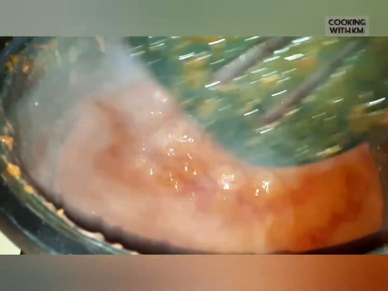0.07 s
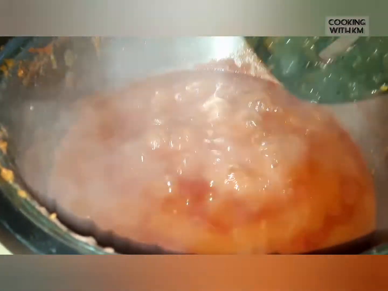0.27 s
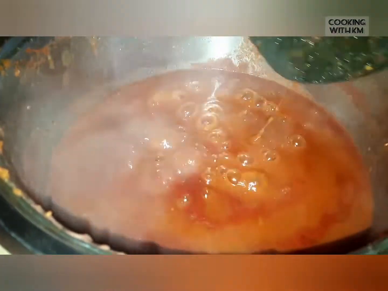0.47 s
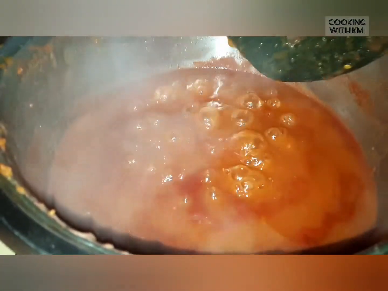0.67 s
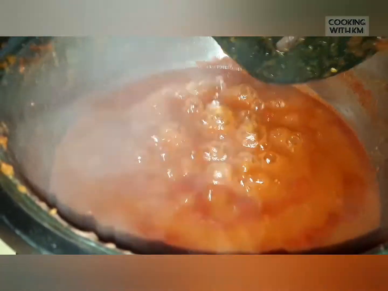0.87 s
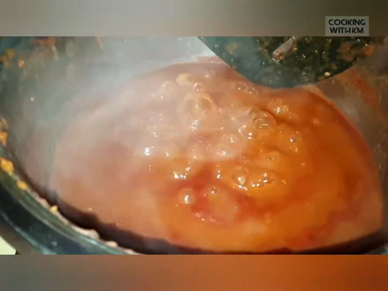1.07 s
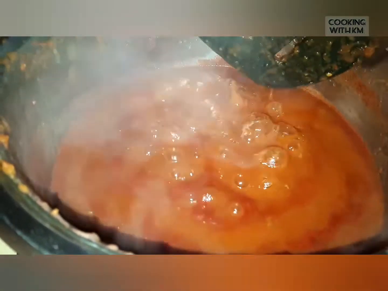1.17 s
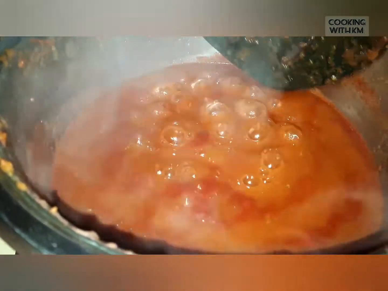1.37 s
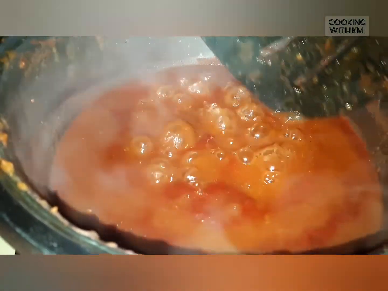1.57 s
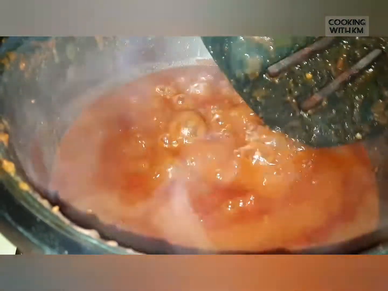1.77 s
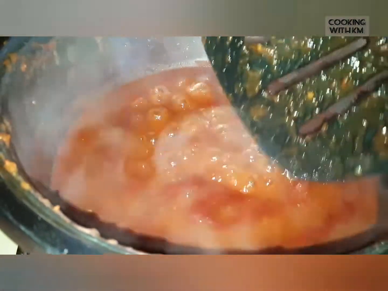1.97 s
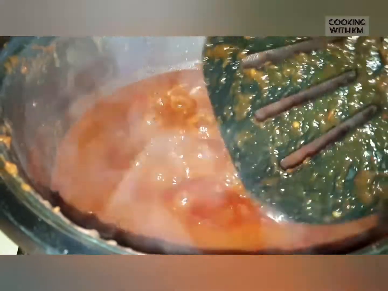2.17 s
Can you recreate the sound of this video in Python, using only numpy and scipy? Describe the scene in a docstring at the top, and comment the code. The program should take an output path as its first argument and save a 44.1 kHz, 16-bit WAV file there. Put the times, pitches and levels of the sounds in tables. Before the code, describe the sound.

Thick tomato sauce boiling in an open pot, bubbles bursting with irregular plops.

```python
"""Tomato sauce on the boil

Thick sauce boils in an open pot in a small kitchen, close by and a little to the left.
Each bubble opens into a short damped note; films snap brightly and droplets tick on the hot wall.
Under them lie small blubs, seeping steam, a steady murmur, a faint sizzle and the stove's hum."""
import sys
import numpy as np
from scipy import signal
from scipy.fft import rfft, irfft, next_fast_len
from scipy.io import wavfile
from scipy.ndimage import uniform_filter1d, map_coordinates

SR = 44100
rng = np.random.default_rng(int(sys.argv[2]) if len(sys.argv) > 2 else 0)


def transcribe(signal):
    """Save signal, clipped to [-1, 1], as a 16-bit WAV file at the path in sys.argv[1]."""
    frames = np.atleast_2d(signal).T
    limited = np.clip(frames, -1, 1)
    pcm = np.round(limited * 32767).astype(np.int16)
    wavfile.write(sys.argv[1], SR, pcm)


N = 97328
T = np.arange(int(.06 * SR)) / SR  # time within one pop, in seconds
POT_PAN_DB, PAN_SCATTER_DB = 5.5, 3  # every pan is left level minus right level


def note(hz, cycles, rise=0.064, opening_cycles=0.48):
    """The air in a softly opening bubble rings for a few cycles, rising slightly in pitch."""
    life_s = cycles / hz
    turns = np.cumsum(hz * (1 + rise * np.minimum(T / life_s, 1))) / SR
    attack = 1 - np.exp(-(turns / opening_cycles) ** 2)
    return np.sin(2 * np.pi * turns) * decay(life_s) * attack


# Large bubbles bursting; the note at 1.5542 s is the loudest pop's echo off the ceiling:
# start_s, pitch_hz, level_db, pan_db
BUBBLE_NOTES = [(0.0966,514,-31,12), (0.1082,327,-26.5,1), (.1133,548,-26.5,6), (0.1291,954,-22,11.5),
                (.1688,744,-29,2), (.192,525,-28.5,7), (0.2613,697,-22,5.5), (.265,730,-29.5,13),
                (0.5407,440,-33,8), (.647,501,-20.5,9), (.6953,665,-32.5,8), (0.7057,592,-24.5,8),
                (0.7352,804,-29.5,-1), (0.7944,486,-28.5,9), (0.825,530,-30.5,7), (0.8361,640,-26,5.5),
                (.924,660,-26,5), (0.986,390,-32,3.5), (1.0729,518,-21,7), (1.0772,776,-15,7.5),
                (1.0876,950,-29,23), (1.306,516,-35,16), (1.3161,500,-31,6), (1.37,510,-28.5,7),
                (1.4202,500,-30,9), (1.522,1010,-17.5,11.5), (1.532,1006,-7,7.5), (1.5542,1024,-22,-1),
                (1.6755,820,-21.5,5), (1.6808,381,-29.5,3.5), (1.7235,510,-35,3), (1.735,500,-29.5,19),
                (1.747,857,-13,3.5), (1.7508,791,-22.5,5), (1.7547,740,-29,10), (1.8315,996,-28.5,1),
                (1.8397,1290,-27.5,-15), (1.937,530,-32,12), (2.0396,560,-30,6.5), (2.0706,830,-27,11),
                (2.12,520,-28.5,8)]
def bubbles():
    """Large bubbles and one ceiling echo: each a note over the low heave of sauce slumping back."""
    out = np.zeros((2, N))
    heave = amp(-18) * note(hz=138, cycles=2.77)
    for start_s, hz, db, pan_db in BUBBLE_NOTES:
        add(out, start_s, amp(db) * (note(hz, cycles=8.45) + heave), pan_db)
    return out


def splutter(count=3, scatter_s=.012, log_spread=0.26, level_db=-39):
    """A few small bubbles cluster around each main note, close in time and pitch."""
    out = np.zeros((2, N))
    for start_s, hz, _, pan_db in BUBBLE_NOTES:
        for when, pitch in rng.standard_normal((count, 2)):
            blub = note(hz * np.exp(log_spread * pitch), cycles=8.17)
            add(out, start_s + scatter_s * when, amp(level_db) * blub, pan_db)
    return out


# Films snapping: start_s, pitch_hz, level_db, pan_db, ring_cycles
FILM_SNAPS = [(0.398, 1600, -43, 14, 24), (0.461, 2360, -44.5, 3, 17), (0.6168, 1470, -34, 3, 4.8),
              (0.6827, 2040, -43.5, 5, 34), (1.0775, 1590, -32, 12, 6.4), (1.1703, 3800, -37.5, 24, 20),
              (1.3669, 1790, -40, 12, 4.5), (1.4687, 3110, -20.5, 3, 24), (1.5214, 2580, -24.5, 2, 10),
              (1.5326, 3260, -27.5, 10, 11), (1.5548, 2440, -31.5, -8, 11), (1.675, 3000, -36, 6, 8.2),
              (1.7469, 2260, -21.5, 10, 11), (1.7646, 2230, -23, -3, 6.4), (1.835, 2760, -29, 8, 4.8),
              (1.8407, 2500, -30, 13, 11), (1.932, 2160, -38.5, 17, 6.5), (2.0651, 1980, -27, 13, 22),
              (2.0697, 2380, -28, 2, 11)]
def spits():
    """A film tears: a high note, ringing or choked to a splat, in a puff of noise around its pitch."""
    out = np.zeros((2, N))
    for start_s, hz, db, pan_db, cycles in FILM_SNAPS:
        attack = 1 - np.exp(-(T * hz) ** 2)
        puff = band(rng.standard_normal(len(T)), hz, octaves=0.28) * decay(0.029) * attack
        add(out, start_s, amp(db) * (note(hz, cycles) + 0.36 * puff), pan_db)
    return out


# Droplets landing on hot metal: start_s, accent_db, pan_db
DROPLETS = [(0.303, -42, 12), (0.38, -45, 4), (.395, -46.5, 6), (0.453, -46, -1), (0.5561, -42.5, 3),
            (.625, -48.5, -1), (1.1243, -38, 7), (1.3949, -43, 3), (1.4689, -31.5, -1), (1.5216, -39, 3),
            (1.8066, -44, 3), (1.9799, -45, -9)]
# Tone of a tick: frequency_hz, gain_db
TICK_EQ = [(1800, 3), (3500, -2.5), (5000, 1), (8000, 3), (11000, -9.5), (16000, -6.5)]
def ticks(level_db=-4, attack_s=.001):
    """Droplets flash to steam on the hot wall: a quick soft spit, then a thin spray."""
    out = np.zeros((2, N))
    spray = amp(-19) * decay(0.3) * (1 - T / T[-1])
    envelope = (1 - np.exp(-T / attack_s)) * (decay(0.012) + spray)
    for start_s, accent_db, pan_db in DROPLETS:
        crack = unit(filtered(rng.standard_normal((2, len(T))), lambda f: amp(along(TICK_EQ, f))))
        add(out, start_s, amp(level_db + accent_db) * crack * envelope, pan_db)
    return out


def small_bubbles(per_s, hz, log_spread, cycles, level_db):
    """Small bubbles of random size pop all over the surface."""
    out = np.zeros((2, N))
    draws = rng.standard_normal((1024, 3))
    starts = rng.uniform(0, N / SR, len(draws))[:int(per_s * N / SR)]
    for start_s, (pitch, accent_db, place) in zip(starts, draws):
        pop = note(hz * np.exp(log_spread * np.clip(pitch, -2, 2)), cycles)
        add(out, start_s, amp(level_db + accent_db) * pop, POT_PAN_DB + PAN_SCATTER_DB * place)
    return out


# Steam escaping through the sauce's skin: start_s, length_s, pitch_hz, level_db
STEAM_SEEPS = [(0.129, 0.18, 1695, -68), (0.36, 0.17, 2270, -71), (0.393, 0.16, 5300, -78.5),
               (1.154, 0.13, 3900, -75)]
def seeps(flutter_db=3, pops_per_s=110, pop_boost_db=20.5):
    """Steam hisses through a small opening, swelling and fading, and froths it into pinhead bubbles."""
    out = np.zeros((2, N))
    for start_s, length_s, hz, db in STEAM_SEEPS:
        hiss = unit(band(rng.standard_normal(N), hz, octaves=.3) * amp(flutter_db * wobble(214)))
        n = int(length_s * SR)
        swell = np.sin(np.pi * np.arange(n) / n)
        add(out, start_s, amp(db) * hiss[:n] * swell, POT_PAN_DB / 2)
        froth = rng.uniform(-1, 1, (256, 3))[:int(pops_per_s * length_s)]
        for when, pitch, place in froth:
            pop = amp(db + pop_boost_db) * note(hz * np.exp(0.29 * pitch), cycles=8.9)
            add(out, start_s + length_s * (1 + when) / 2, pop, POT_PAN_DB + PAN_SCATTER_DB * place)
    return out


# Tone of the murmur: frequency_hz, gain_db
SIMMER_EQ = [(25, -17), (120, 5.5), (229, -1.5), (285, -1.5), (451, -16.5), (545, 3), (734, -18), (911, -6),
             (1370, -24), (1940, -24), (2480, -35.5), (4030, -34), (5730, -44), (7710, -33.5),
             (8590, -47.5), (16000, -38)]
def simmer(level_db=-50.5, patchy_db=4):
    """The boil and the room murmur steadily, patchy in the mids, even in the bass and treble."""
    hz, _, spectrum = signal.stft(rng.standard_normal((2, N)), SR, nperseg=512)
    patches = uniform_filter1d(rng.standard_normal(spectrum.shape[1:]), size=4, axis=0)
    patches = unit(uniform_filter1d(patches, size=6, axis=1))
    mids = (hz / (hz + 150) / (1 + hz / 3000))[:, None]
    noise = signal.istft(spectrum * amp(patchy_db * patches * mids), nperseg=512)[1][:, :N]
    murmur = filtered(noise, lambda f: amp(along(SIMMER_EQ, f)))
    return amp(level_db) * unit(stereo_image(murmur))


# Tone of the frying: frequency_hz, gain_db
SIZZLE_EQ = [(1500, -9), (2600, -0.5), (4200, -6), (6000, -12.5), (7800, -9), (9000, -15.5), (16000, -16.5)]
def sizzle(level_db=-71.5, flutter_db=1.5, low_cut_hz=1000):
    """Sauce fries faintly at the rim."""
    noise = rng.standard_normal((2, N))
    hiss = unit(filtered(noise, lambda f: amp(along(SIZZLE_EQ, f)) * f / (f + low_cut_hz)))
    return hiss * amp(level_db + flutter_db * wobble(150))


# The stove's low tones: pitch_hz, level_db
STOVE_TONES = [(58, -66), (120.5, -61.5)]
def stove_hum(waver_db=2.5):
    """The stove hums, each tone wavering in level and phase."""
    out = np.zeros((2, N))
    t = np.arange(N) / SR
    for hz, db in STOVE_TONES:
        peak = np.sqrt(2) * amp(db + waver_db * wobble(8.06))
        out += peak * np.sin(2 * np.pi * hz * t + 0.35 * wobble(4.4)) * lean_left(hz)
    return out


# How the pot dulls the bubbles: frequency_hz, gain_db
POT_EQ = [(1120, 2), (1400, -6), (1700, -3.5), (2000, -5), (2950, -4), (3500, -12.5), (4200, -5),
          (5200, -4.5)]
# Air resonances of the pot: pitch_hz, width_hz, gain_db
POT_RESONANCES = [(514, 16, -2), (670, 29, -37.5), (930, 26, -27.5), (1027, 33, -4), (1910, 67, -6),
                  (2790, 36, -10)]
def pot(x):
    """The pot colours the sound and rings on at its air resonances."""
    def response(f):
        cepstrum = irfft(np.log(amp(along(POT_EQ, f))))
        n = np.arange(len(cepstrum))
        causal_fold = np.sign(len(n) / 2 - n) + (n > 0)  # makes the colour minimum phase
        colour = np.exp(rfft(cepstrum * causal_fold))
        ring = sum(amp(db) * 1j * f * width / (hz * hz - f * f + 1j * f * width)
                   for hz, width, db in POT_RESONANCES)
        return colour * (1 + ring)
    return filtered(x, response)


# The kitchen's short decay: frequency_hz, t60_s
KITCHEN_DECAY = [(150, .3), (1000, .22), (3000, .19), (12000, .18)]
def reflections(x, echo_s=0.02):
    """Sound bounces off the pot's walls, the kitchen and one hard surface overhead."""
    walls = amp(-12.5) * reverb(x, t60_points=[(1000, 0.04)], delay_s=0.00206)
    room = amp(-11) * reverb(x, KITCHEN_DECAY, delay_s=.008)
    echo = amp(-22) * np.pad(x, ((0, 0), (int(echo_s * SR), 0)))[:, :N]
    return x + stereo_image(walls + room) + echo


def reverb(x, t60_points, delay_s):
    """Dense reflections: a two-channel tail of decaying noise after a pre-delay."""
    hz, t, spectrum = signal.stft(rng.standard_normal((2, SR // 2)), SR, nperseg=128)
    fade = amp(-60 * t / along(t60_points, hz)[:, None])
    tail = signal.istft(spectrum * fade, SR, nperseg=128)[1]
    tail = np.pad(tail / np.linalg.norm(tail[0]), ((0, 0), (int(delay_s * SR), 0)))
    return signal.fftconvolve(x.mean(axis=0)[None], tail, axes=1)[:, :N]


# How alike left and right are: frequency_hz, correlation
STEREO_LIKENESS = [(50, 0.82), (150, 1), (500, 0.31), (1200, 0.077), (3000, 0.11), (12000, 0.28)]
def stereo_image(pair):
    """Spread two unrelated signals as mid and side: near mono in the bass, wide above, leaning left."""
    def mid_side_gains(f):
        angle = np.arccos(np.clip(along(STEREO_LIKENESS, f), -1, 1)) / 2
        return np.array([np.cos(angle), np.sin(angle)])
    mid, side = filtered(pair, mid_side_gains)
    return filtered(np.array([mid + side, mid - side]), lean_left)


# Balance of the background and reverb: frequency_hz, pan_db
BACKGROUND_PAN = [(50, 1.5), (150, 3), (600, 3), (2000, 9.5), (8000, 4.5)]
def lean_left(hz):
    """Left and right gains that tip each frequency to the left."""
    return amp(np.outer([.5, -.5], along(BACKGROUND_PAN, hz)))


def amp(db):
    """Gain of a level in dB."""
    return 10 ** (np.asarray(db) / 20)


def unit(x):
    """Scale to rms 1."""
    return x / np.sqrt(np.mean(x ** 2) + 1e-20)


def along(points, hz):
    """Read (frequency_hz, value) points on a log frequency axis."""
    f, values = np.transpose(points)
    return np.interp(np.log(hz + 1), np.log(f + 1), values)


def filtered(x, response):
    """Shape x with a frequency response."""
    n = x.shape[-1]
    padded = next_fast_len(n + 8192)
    return irfft(rfft(x, padded) * response(np.fft.rfftfreq(padded, 1 / SR)), padded)[..., :n]


def band(noise, hz, octaves):
    """Narrow noise to a bell around hz, at rms 1."""
    return unit(filtered(noise, lambda f: np.exp(-.5 * (np.log2((f + 1) / hz) / octaves) ** 2)))


def wobble(per_s):
    """A smooth curve through per_s random values a second."""
    return map_coordinates(rng.standard_normal(int(N * per_s / SR) + 4), [np.arange(N) * per_s / SR])


def decay(t60_s):
    """An envelope that is 60 dB down after t60_s."""
    return np.exp(-np.log(1000) * T / t60_s)


def add(out, start_s, sound, pan_db):
    """Pan a sound and place it in the stereo track."""
    i = int(np.clip(round(start_s * SR), 0, N - 1))
    sides = amp([pan_db / 2, -pan_db / 2])
    out[:, i:i + sound.shape[-1]] += (sides / sides.mean())[:, None] * sound[..., :N - i]


def scene():
    """Bubbles ring in the pot and out into the kitchen, over the murmur, sizzle and hum."""
    blubs = small_bubbles(per_s=280, hz=476.6, log_spread=0.3, cycles=8.17, level_db=-45.5)
    fizz = small_bubbles(per_s=52, hz=2380, log_spread=0.29, cycles=8.9, level_db=-62)
    boil = pot(bubbles() + splutter() + spits() + blubs + fizz)
    return reflections(boil + ticks() + seeps()) + simmer() + sizzle() + stove_hum()


def record(dry, low_cut_hz=45, top_hz=15800):
    """The microphone drops the deepest bass and keeps nothing above its band limit."""
    thin = signal.sosfilt(signal.butter(4, low_cut_hz, "highpass", fs=SR, output="sos"), dry)
    return filtered(thin, lambda hz: hz < top_hz)


dry = scene()
out = record(dry)
transcribe(out)
```